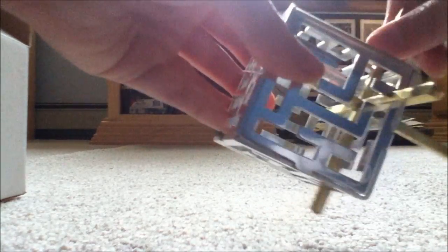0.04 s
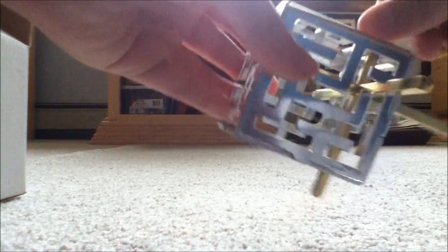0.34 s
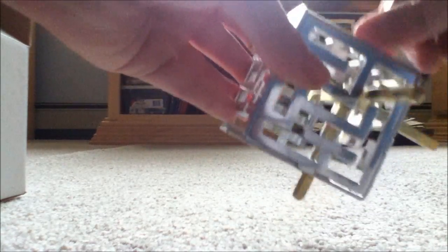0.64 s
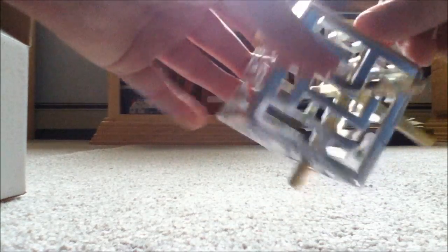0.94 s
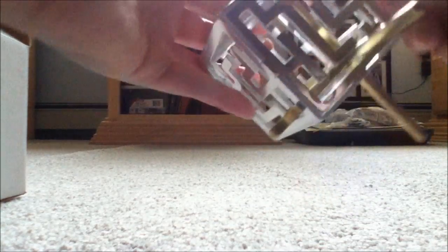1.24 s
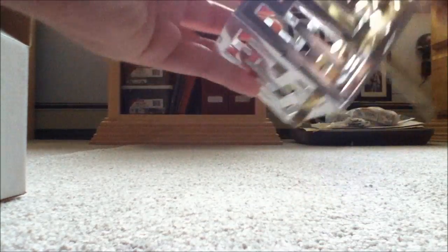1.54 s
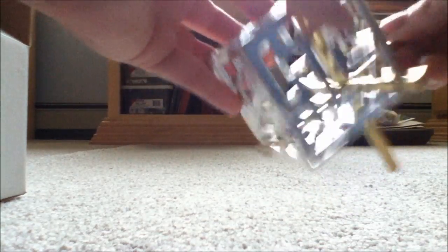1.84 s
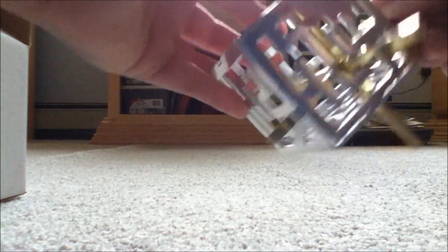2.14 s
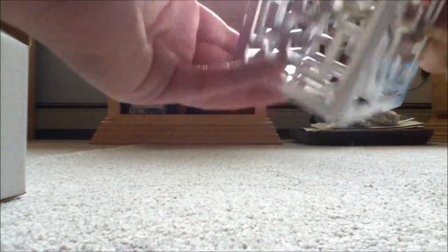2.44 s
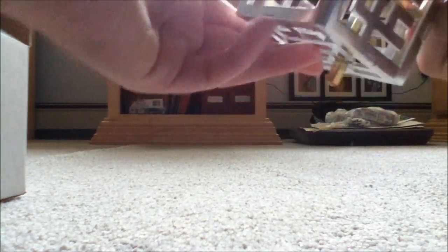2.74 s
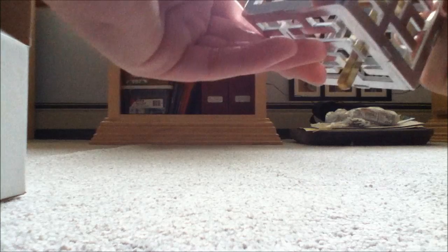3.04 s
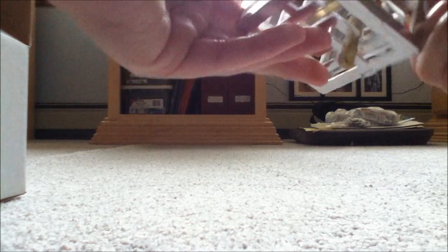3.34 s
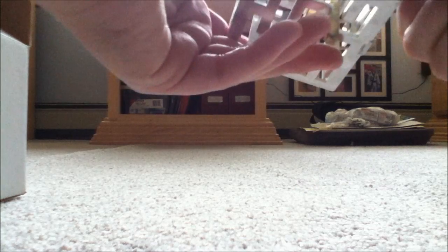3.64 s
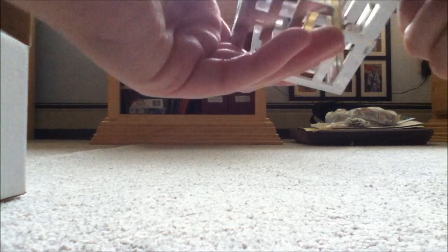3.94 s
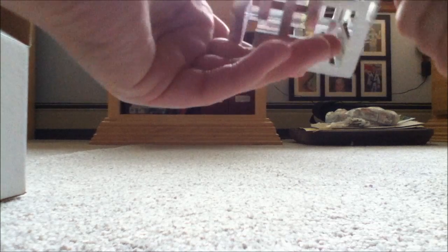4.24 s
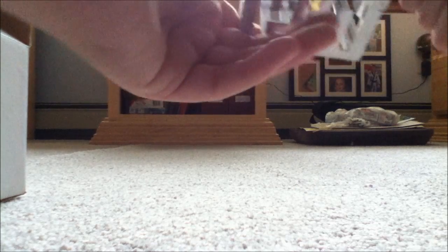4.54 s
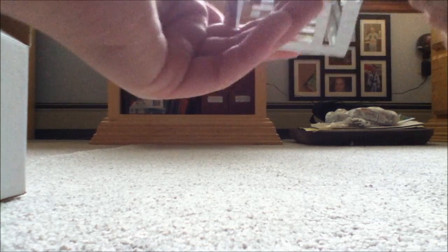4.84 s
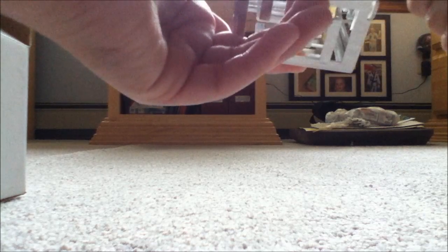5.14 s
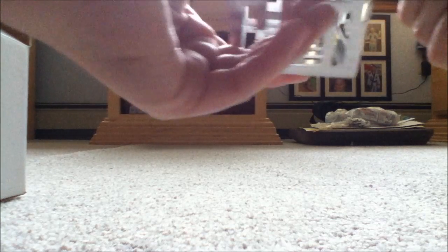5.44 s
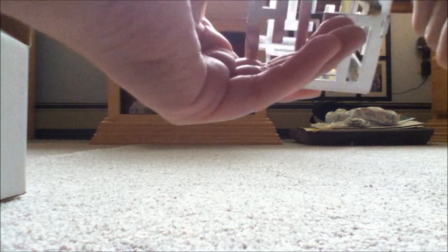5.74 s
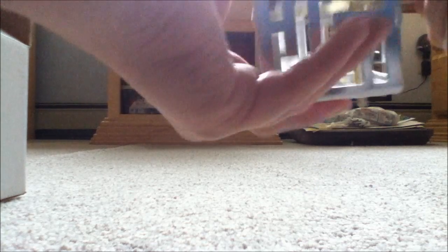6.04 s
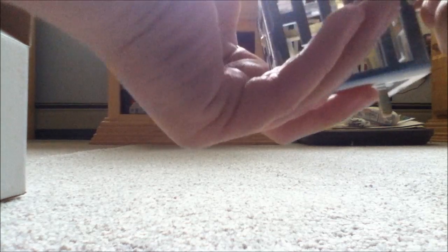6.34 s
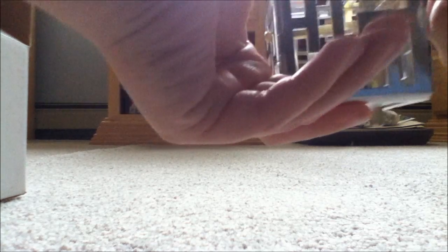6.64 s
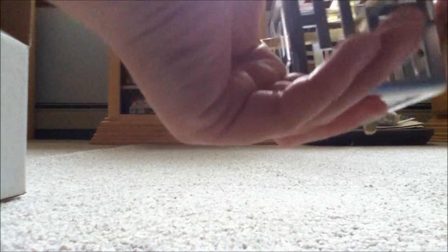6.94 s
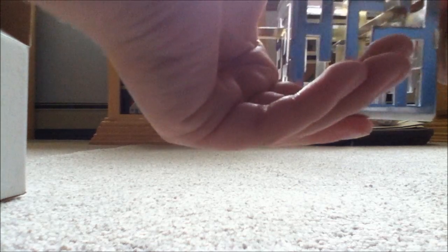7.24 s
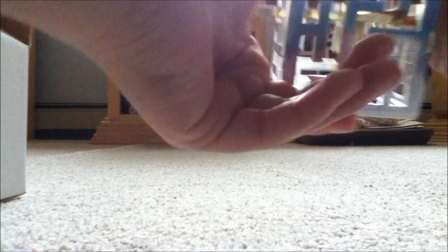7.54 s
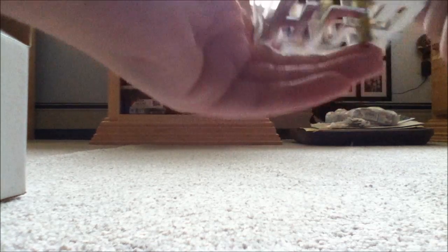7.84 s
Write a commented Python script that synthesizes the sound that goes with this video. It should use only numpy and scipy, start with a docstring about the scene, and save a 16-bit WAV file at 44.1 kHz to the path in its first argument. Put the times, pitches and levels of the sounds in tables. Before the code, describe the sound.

Close up in a quiet carpeted room, with faint hiss and low rumble, a metal pin ticks and clinks inside a small hand-held metal puzzle. The bright, short clicks come in irregular clusters mixed with tiny scrapes. They ease off while the cube knocks softly against the fingers and the grip shifts with muffled thuds, then return in a longer run of rattling and slightly squeaky skids that gradually grows sparse.

```python
"""Over low room rumble and hiss, a brass spike is worked through a small cast-metal maze cube,
hand-held close to the microphone in a carpeted room. For 2 s it clicks and rattles on the bars,
at times skidding along one into the next slot; the fingers damp most of the ringing.
In a lull the cube knocks softly on the fingers twice, near 3 s, then the grip shifts with dull bumps.
From 4.2 s the clicks and skids are busy again, thinning toward the end at 8 s."""
import sys
import numpy as np
from scipy import signal
from scipy.fft import rfft, irfft
from scipy.io import wavfile

SR = 44100
rng = np.random.default_rng(int(sys.argv[2]) if len(sys.argv) > 2 else 0)


def wrap_up_sound(samples):
    """Save the sound to the file named by the first command line argument, as 16-bit audio."""
    columns = np.atleast_2d(samples).T
    # keep every value between -1 and 1, then stretch to whole-number steps
    tamed = np.clip(columns, -1, 1)
    steps = np.round(tamed * 32767).astype(np.int16)
    wavfile.write(sys.argv[1], SR, steps)


N = 352359
RING_SAMPLES, CUTOFF_HZ = 7000, 15900

# spike meets bar: t/s, level/dB, second touch/dB re first, body/dB, brightness/dB,
# favoured f/Hz, free ring/dB re first touch
CONTACTS = [(0.001, -18.5, -1.5, -8.5, -8.5, 5200, -26), (0.0193, -31.5, -13, -3, 0, 8600, -3),
            (0.099, -44.5, 7.5, -2, -7, 5300, -20), (0.2728, -46, 9, -4.5, -2, 14700, -15),
            (0.395, -22.5, -1.5, -9.5, -1, 7900, -25), (0.4198, -30, -19, -16, -4, 7800, -22),
            (0.453, -34, -15, -12, -6, 7800, -22), (0.467, -25, 2.5, -10.5, 1, 5230, -28),
            (0.51, -29, -6, -1.5, -4, 6400, -25), (0.5382, -12.5, -12.5, -9, 1, 11000, -35),
            (0.5993, -23, -25, -7, 7.5, 13600, -22), (0.6996, -43, -14, -6, -3, 4300, -12),
            (0.7456, -40, -16, -2, -5, 4530, -7), (0.786, -29.5, -5, -10.5, 0.5, 4230, -11.5),
            (0.9432, -51.5, -15, -2.5, -14, 1410, -14), (1.0437, -39, -14, -18, -6, 4860, -22),
            (1.117, -17.5, -8.5, -18, -2, 10100, -28), (1.1257, -20.5, -12, -18, -4, 8768, -3),
            (1.2023, -38, -12, -11, -7, 7160, -18), (1.339, -27.5, -6, -12, -2.5, 9100, -28),
            (1.3823, -32.5, -13, -10, -3, 5130, -28), (1.5576, -26, -25, -15.5, -5, 1800, -13),
            (1.6097, -33.5, -20, -14, -6, 7900, -28), (1.738, -36.5, -12, -8, -4, 5000, -22),
            (1.805, -37, -18, -5.5, -6, 3580, -22), (1.8186, -39, -13, -2, -12, 4300, -18),
            (1.8565, -32.5, -19, -4, -3, 8840, -25), (1.8685, -17.5, -12, -23, -0.5, 7500, -32),
            (1.89, -13.5, -16, -13, 5.5, 11450, -35), (1.9644, -29, -3.5, -11.5, 2.5, 3740, -19),
            (2.0625, -31.5, -24, -11.5, 3, 4240, -33), (2.0886, -31, -5, -14, 2, 6050, -25),
            (2.5767, -31, -16, -21, -4, 8768, -3), (2.7934, -39, -8, -14, -3, 9000, -21),
            (2.927, -53.5, -17, -2, -10, 2930, -20), (3.8165, -45.5, -5, -9.5, -2, 8530, -3),
            (4.2002, -29.5, -9, -8, -9, 3560, -19), (4.2173, -28.5, -11, -12.5, -7, 9400, -13),
            (4.3656, -35, 1.5, -25, 0.5, 11260, -22), (4.383, -34, -4.5, -15.5, -7, 4670, -25),
            (4.5414, -32.5, -6, -17, -2, 5100, -24), (4.585, -26, -1, -12.5, -8, 8100, -24),
            (4.7007, -37.5, -15, -17, -3, 6200, -22), (4.7338, -20.5, -20, -10, 2, 11000, -16),
            (4.814, -24.5, -13, -16, -5, 8350, -25), (4.8442, -11.5, -24, -15.5, -2, 13400, -28),
            (4.8526, -14, -9.5, -14, -1, 13335, -28), (4.9203, -38.5, -12, -12, -4, 3900, -5),
            (4.9489, -35, -4, -17, -6, 3860, -22), (4.984, -41.5, -10, -12, -16, 4780, -20),
            (5.0572, -20.5, -9, -11, -2.5, 3730, -26), (5.1077, -28.5, -3, -12, -11, 2860, -27),
            (5.129, -37, -14, -6, -10, 8530, -20), (5.2708, -46.5, -15, -6.5, -9, 3660, -20),
            (5.389, -37.5, -12, -11, 3, 10790, -22), (5.4278, -29, -15, -14, -9.5, 3920, -17),
            (5.4893, -16, -7, -16, -1.5, 9300, -30), (5.513, -26, -8, -17, -7, 5020, -28),
            (5.53, -30, -12, -14, -1, 4880, -25), (5.6452, -29, -12, -14, -5, 5140, -25),
            (5.652, -21, -11, -18.5, -4.5, 4950, -27), (5.717, -35.5, -2.5, -11, -7, 3740, -22),
            (5.8126, -27.5, -3, -16, -3, 5400, -18), (5.826, -31, -16, -5, 2, 9600, -26),
            (5.8717, -21, -21, -19, 0.5, 13000, -31), (5.9874, -27, -6, -9.5, -5, 5170, -25),
            (6.0152, -28, -19, -10, 2, 4500, -8), (6.058, -30.5, -10, -18, -7, 6950, -26),
            (6.067, -37.5, 0.5, -6.5, -13, 8460, -25), (6.0984, -18, 6.5, -21.5, -2.5, 13400, -16),
            (6.2886, -26.5, -9, -9, 3, 9900, -26), (6.3096, -22, -7, -5.5, 0, 13500, -24),
            (6.331, -24, 1, -18, -3, 13330, -17), (6.499, -39, -19.5, -14, 0, 9100, -20),
            (6.5948, -32, -11, -11.5, -9, 3700, -22), (6.6028, -30, -2.5, -11, -11, 6370, -25),
            (6.7744, -23.5, 3.5, -5.5, 1, 5430, -25), (6.7893, -21, -1, -32, -10, 5150, -28),
            (6.811, -10, -13, -17, -6.5, 2000, -29.5), (6.816, -9.5, -28, -20.5, -3.5, 7260, -29),
            (6.9969, -37, -13, -8.5, -4, 9100, -15), (7.083, -43.5, -13, -9.5, -18, 4900, -22),
            (7.362, -28, 4, -14, -11.5, 3680, -22), (7.5503, -27.5, -2.5, -25, 2.5, 4850, -28),
            (7.6214, -40, -5, -15, 1, 5000, -20), (7.656, -30, 6, -14, 1, 3960, -25),
            (7.7814, -45.5, -15, -12, -12, 5420, -22), (7.883, -37, -4, -10.5, -4.5, 10170, -25)]
# spike and cage modes that outlast the grip: f/Hz, relative level/dB, t60/s
RINGS = [(1480, 12, .13), (1780, -8, .09), (1905, -1, .27), (2435, 4, .13), (3832, 8, .09), (4290, -4, .14),
         (4870, -5, .1), (5970, 3, .09), (7165, -8, .13), (7760, -20, .13), (8300, 3, .13), (8768, 4, .1),
         (10560, -10, .125), (13335, 2, .15)]


def from_db(db):
    return 10 ** (np.asarray(db) / 20)


def rms_one(x):
    return x / np.sqrt(np.mean(x ** 2) + 1e-20)


def add(out, t_s, sound):
    """Mix a sound in at t_s."""
    at = min(max(round(t_s * SR), 0), N)
    out[at:at + len(sound)] += sound[:N - at]


def gain_at(spectrum, hz):
    """Gain of an outline (f/Hz, level/dB), interpolated over log f."""
    outline_hz, outline_db = np.transpose(spectrum)
    return from_db(np.interp(np.log(np.maximum(hz, 1)), np.log(outline_hz), outline_db))


def noise(spectrum):
    """Steady coloured noise, rms 1."""
    hz = np.arange(N // 2 + 1) * SR / N
    return rms_one(irfft(rfft(rng.standard_normal(N)) * gain_at(spectrum, hz), N))


def ringing(hz, t60_s):
    """One decaying sine per mode, as rows."""
    t = np.arange(RING_SAMPLES) / SR
    return np.sin(2 * np.pi * hz[:, None] * t) * np.exp(-np.log(1000) * t / t60_s[:, None])


def presence(x):
    """The band in which click and skid levels are set."""
    return signal.sosfilt(signal.butter(2, [2800, 8500], "band", fs=SR, output="sos"), x)


def background(rumble_trim_db=0.23, hiss_db=-56):
    """Slowly drifting room rumble and even microphone hiss."""
    rumble_levels = [(0.0, -50), (0.89, -53.5), (1.6, -51), (2.11, -56.5), (4.18, -47.5), (4.38, -52),
                     (7.99, -52.5)]  # rumble envelope: t/s, level/dB before trim
    rumble_spectrum = [(20, -43), (40, -44), (62, -5.5), (100, -2.5), (160, -1), (280, -2), (400, -6),
                       (600, -16), (1000, -40.5), (2000, -36.5)]  # f/Hz, relative density/dB
    hiss_spectrum = [(300, 11), (1000, 1), (2000, -2), (4000, -2.5), (8000, -4), (12000, -5.5),
                     (16000, -11.5)]  # f/Hz, relative density/dB
    rumble_db = np.interp(np.arange(N) / SR, *np.transpose(rumble_levels)) + rumble_trim_db
    return from_db(rumble_db) * noise(rumble_spectrum) + from_db(hiss_db) * noise(hiss_spectrum)


def cage_modes(count=240, grip_t60_s=0.032, treble_choke=0.29, ring_gain_db=-24,
               crack_db=-0.5, crack_s=0.0014, crack_from_hz=5000):
    """Lattice modes, a crowd choked by the fingers and a few that ring on: f/Hz, strength, waves."""
    click_spectrum = [(150, -7), (400, -14.5), (750, -9.5), (1100, -11.5), (1450, -5.5), (2100, -8),
                      (2900, -1.5), (3800, 1), (5200, 3.5), (7000, 1), (9000, 0), (11500, -2), (14000, -7),
                      (16000, -13)]  # f/Hz, relative density/dB
    crowd_hz = 150 + (np.arange(count) + rng.random(count)) * CUTOFF_HZ / count
    crowd_t60_s = grip_t60_s * (crowd_hz / 5000) ** -treble_choke * from_db(rng.normal(0, 0.5, count))
    ring_hz, ring_db, ring_t60_s = np.transpose(RINGS)
    hz = np.r_[crowd_hz, ring_hz]
    strength = np.r_[gain_at(click_spectrum, crowd_hz), from_db(ring_db + ring_gain_db)]
    # the struck bar cracks brightly before its energy spreads through the lattice
    crack_gain = from_db(crack_db) / (1 + (crack_from_hz / hz[:, None]) ** 2)
    crack = crack_gain * np.exp(-np.arange(RING_SAMPLES) / (crack_s * SR))
    return hz, strength, (1 + crack) * ringing(hz, np.r_[crowd_t60_s, ring_t60_s])


def colour(hz, body_db, bright_db, favour_hz, favour_db, flat_body_db=-13, flat_bright_db=-4):
    """Mode gains at one place on the cage: low shelf, high shelf, one favoured region."""
    low = 1 / (1 + (hz / 2600) ** 6)
    high = 1 / (1 + (8800 / hz) ** 8)
    near = 1 / (1 + ((hz - favour_hz) / 230) ** 2)
    return from_db(low * (body_db - flat_body_db) + high * (bright_db - flat_bright_db) + near * favour_db)


def chatter(touch_db=-3, bounces=7, bounce_db=-8.5, span_s=0.0016):
    """Metal-on-metal force: one sharp touch, then micro-bounces."""
    force = np.zeros(400)
    at = (rng.random(bounces) * span_s * SR).astype(int)
    force[at] = from_db(bounce_db) * rng.standard_normal(bounces)
    force[0] = from_db(touch_db)
    return force


def click(cage, level_db, body_db, bright_db, favour_hz, scatter=0.36, nominal_length_s=0.0035):
    """One touch strikes all modes with fresh weights and signs."""
    hz, strength, waves = cage
    weights = rng.choice([-1, 1], len(hz)) * (1 + scatter * rng.standard_normal(len(hz)))
    response = (weights * strength * colour(hz, body_db, bright_db, favour_hz, favour_db=8)) @ waves
    sound = signal.fftconvolve(response, chatter())
    band_rms = np.sqrt(np.sum(presence(sound) ** 2) / (nominal_length_s * SR))
    return from_db(level_db) * sound / band_rms


def clicks(cage, rock_s=0.0035, spread=0.36):
    """The spike touches a bar, rocks and touches it again."""
    out = np.zeros(N)
    delays_s = rock_s * (1 + spread * rng.uniform(-1, 1, len(CONTACTS)))
    for delay_s, (t_s, level_db, second_db, body_db, bright_db, favour_hz, _) in zip(delays_s, CONTACTS):
        add(out, t_s, click(cage, level_db, body_db, bright_db, favour_hz))
        add(out, t_s + delay_s, click(cage, level_db + second_db, body_db, bright_db, favour_hz))
    return out


def pings():
    """The long mode nearest the struck bar's pitch rings as freely as the grip allows."""
    out = np.zeros(N)
    ring_hz, _, ring_t60_s = np.transpose(RINGS)
    waves = ringing(ring_hz, ring_t60_s)
    for t_s, level_db, *_, favour_hz, free_db in CONTACTS:
        nearest = np.argmin(abs(ring_hz - favour_hz))
        add(out, t_s, from_db(level_db + free_db) * waves[nearest])
    return out


def room(x, near_db=-14, near_t60_s=0.019, far_db=-19, far_t60_s=0.17):
    """Quick wash off hands and furniture; faint, duller tail from the carpeted room."""
    t = np.arange(SR // 2) / SR
    onset = 1 - np.exp(-(t / 0.0036) ** 2)
    near, far = (rng.standard_normal(len(t)) * onset * np.exp(-np.log(1000) * t / t60_s)
                 for t60_s in (near_t60_s, far_t60_s))
    far = signal.sosfilt(signal.butter(1, 10000, fs=SR, output="sos"), far)
    echo = from_db(near_db) * near / np.linalg.norm(near) + from_db(far_db) * far / np.linalg.norm(far)
    return signal.fftconvolve(x, echo)[:N]


def rattle(cage, ticks=2, relative_db=-21.5, spread_db=4, from_s=0.006, to_s=0.018):
    """Light ticks as the spike settles in its slot after each contact."""
    out = np.zeros(N)
    for t_s, level_db, *_, favour_hz, _ in CONTACTS:
        delays_s = rng.uniform(from_s, to_s, ticks)
        ticks_db = rng.normal(level_db + relative_db, spread_db, ticks)
        for delay_s, tick_db in zip(delays_s, ticks_db):
            add(out, t_s + delay_s, click(cage, tick_db, body_db=-8, bright_db=-8, favour_hz=favour_hz))
    return out


def brushes(cage, count=14, level_db=-52.5, spread_db=0.5):
    """Faint ticks at random times: the spike barely brushes a bar."""
    out = np.zeros(N)
    for t_s in rng.random(count) * N / SR:
        tick_db = rng.normal(level_db, spread_db)
        add(out, t_s, click(cage, tick_db, body_db=-8, bright_db=-8, favour_hz=4200))
    return out


def skids(cage, slips_per_s=1200, uneven_db=3.5, swell_db_per_s=172, squeak_hz=5300):
    """Tiny uneven slips along a bar drive the cage; pressed ever harder, they swell and squeak."""
    slides = [(0.38, 0.4, -40.5, 2), (0.477, 0.535, -31, -10), (1.074, 1.132, -31.5, -4),
              (1.866, 1.888, -27, 1), (4.721, 4.754, -40.5, 8), (4.822, 4.85, -31, 20),
              (5.043, 5.062, -45, 5), (5.471, 5.496, -38, 13), (5.606, 5.644, -49, 4),
              (5.779, 5.802, -47, -7), (6.092, 6.105, -30, 2), (6.269, 6.292, -50, 4),
              (6.773, 6.823, -22, 12), (7.342, 7.358, -51.5, 10)]  # start/s, end/s, end level/dB, squeak/dB
    hz, strength, waves = cage
    out = np.zeros(N)
    for start_s, end_s, end_db, squeak_db in slides:
        n = int((end_s - start_s) * SR)
        slips = (rng.random(n) < slips_per_s / SR) * from_db(uneven_db * rng.standard_normal(n))
        force = rms_one(slips * rng.choice([-1, 1], n) + 0.088 * rng.standard_normal(n))
        gains = colour(hz, body_db=-7.5, bright_db=-5, favour_hz=squeak_hz, favour_db=squeak_db)
        response = (rng.choice([-1, 1], len(hz)) * strength * gains) @ waves
        response /= np.linalg.norm(presence(response))
        swell = from_db(end_db + swell_db_per_s * np.arange(-n, 0) / SR)
        add(out, start_s, signal.fftconvolve(force * swell, response))
    return out


def knocks(t60_s=0.033, spread=0.172, count=10):
    """The cube settles against the fingers: a muffled cluster of fast-dying low tones."""
    settlings = [(2.819, -45, 650), (3.130, -39, 417)]  # t/s, level/dB, centre f/Hz
    out = np.zeros(N)
    for t_s, level_db, hz in settlings:
        tones = ringing(hz * np.exp(spread * rng.standard_normal(count)), np.full(count, t60_s))
        add(out, t_s, from_db(level_db) * rng.choice([-1, 1], count) @ tones / np.sqrt(count))
    return out


def bumps():
    """Soft thuds swell and fade in a few low resonances as the grip shifts."""
    grip_shifts = [(3.416, -49, 0.027), (4.02, -45, 0.036), (4.139, -43, 0.041), (4.193, -26, 0.012),
                   (4.23, -38, 0.031)]  # peak t/s, level/dB, Gaussian width/s
    resonances = [(112, -12), (170, -0.5), (197, 1), (232, -1.5), (261, 0), (283, -0.5), (380, -14),
                  (435, -32.5), (492, -28)]  # f/Hz, relative level/dB
    hz, mode_db = np.transpose(resonances)
    out = np.zeros(N)
    for t_s, level_db, width_s in grip_shifts:
        t = np.arange(-4 * width_s, 4 * width_s, 1 / SR)
        swell = np.exp(-0.5 * (t / width_s) ** 2)
        tones = np.sin(2 * np.pi * (hz[:, None] * t + rng.random((len(hz), 1))))
        thud = swell * (from_db(mode_db) @ tones)
        add(out, t_s + t[0], from_db(level_db) * thud * np.linalg.norm(swell) / np.linalg.norm(thud))
    return out


def scene(radiate_from_hz=130):
    """Puzzle, room, handling and background; mono."""
    cage = cage_modes()
    puzzle = clicks(cage) + pings() + rattle(cage) + brushes(cage) + skids(cage)
    # so small a body radiates no deep bass
    puzzle = signal.sosfilt(signal.butter(2, radiate_from_hz, "high", fs=SR, output="sos"), puzzle)
    return (puzzle + room(puzzle) + knocks() + bumps() + background())[None]


def record(dry):
    """Soft clip, then steep low-pass."""
    rounded = 1.2 * np.tanh(dry / 1.2)
    return signal.sosfilt(signal.ellip(10, 0.2, 80, CUTOFF_HZ, fs=SR, output="sos"), rounded)


dry = scene()
out = record(dry)
wrap_up_sound(out)
```